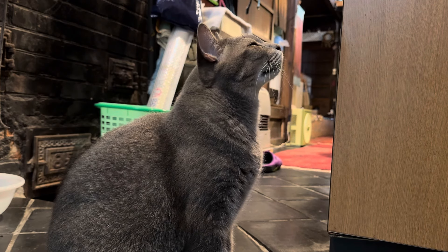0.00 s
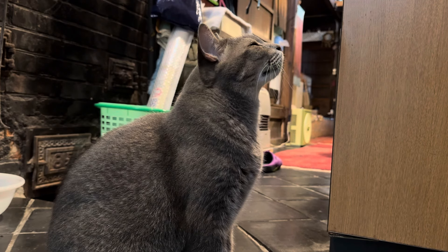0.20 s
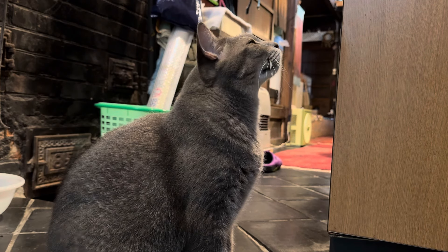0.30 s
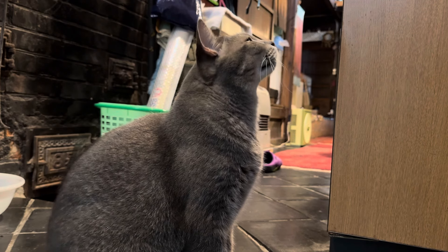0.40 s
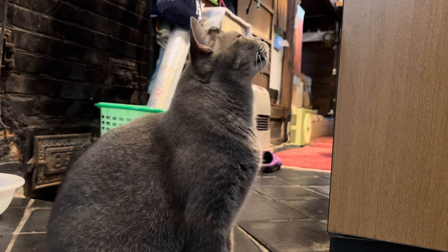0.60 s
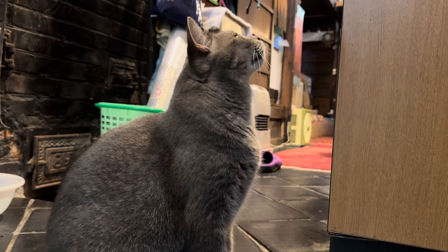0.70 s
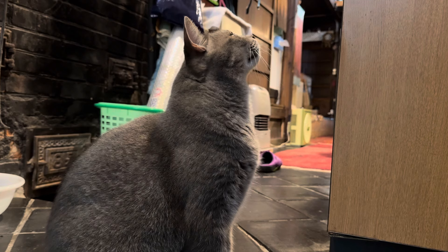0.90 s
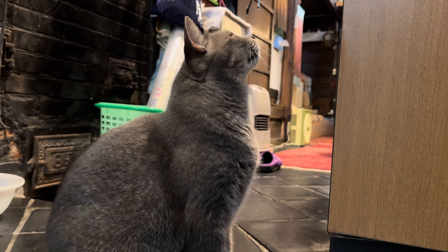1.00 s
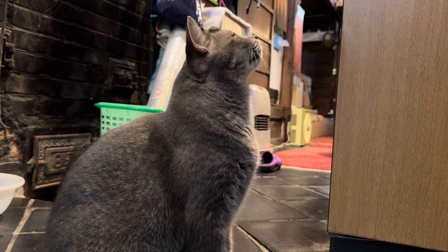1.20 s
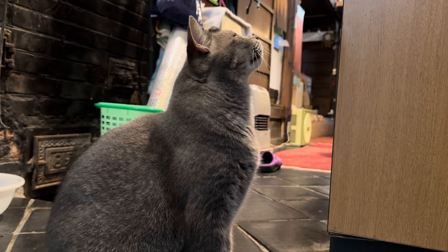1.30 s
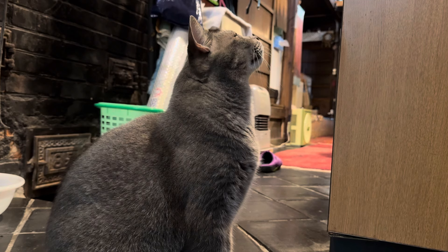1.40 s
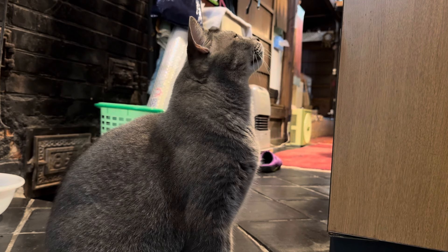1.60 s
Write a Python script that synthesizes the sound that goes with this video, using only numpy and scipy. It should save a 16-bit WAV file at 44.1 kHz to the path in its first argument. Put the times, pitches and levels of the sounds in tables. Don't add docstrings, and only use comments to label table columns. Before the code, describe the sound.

Crinkly plastic packet handled on a hollow wooden surface, with dull knocks, a scrape and crisp crackles

```python
import sys
import numpy as np
from scipy import signal
from scipy.fft import rfft, irfft, next_fast_len
from scipy.io import wavfile
from scipy.ndimage import map_coordinates

SR = 44100
rng = np.random.default_rng(int(sys.argv[2]) if len(sys.argv) > 2 else 0)


def field_ratio(decibels):
    return 10 ** (np.asarray(decibels, dtype=float) / 20)


def to_wav(s):
    ch = np.atleast_2d(s).T
    pcm = np.round(np.clip(ch, -1, 1) * 32767)
    wavfile.write(sys.argv[1], SR, pcm.astype(np.int16))


N = 74970

PORT_LAG_S = 6e-5


def unit(x):
    return x / np.sqrt(np.mean(x ** 2) + 1e-20)


def along(points, hz):
    f, v = np.transpose(points)
    return np.interp(np.log(hz + 1), np.log(f + 1), v)


def curve(rows):
    return np.interp(np.arange(N) / SR, *np.transpose(rows))


def filtered(x, response):
    m = next_fast_len(x.shape[-1] + SR // 4)
    return irfft(rfft(x, m) * response(np.fft.rfftfreq(m, 1 / SR)), m)[..., :x.shape[-1]]


def coloured(x, spectrum):
    lowest_hz = spectrum[0][0]
    return filtered(x, lambda hz: field_ratio(along(spectrum, hz)) / np.sqrt(1 + (lowest_hz / (hz + 1)) ** 4))


def add(track, s, sound):
    part = track[..., round(s * SR):][..., :sound.shape[-1]]
    part += sound[..., :part.shape[-1]]


def slips(rate, spread_db):
    released = rng.random(N) < rate / SR
    sign = rng.choice([-1, 1], N)
    size_db = spread_db * np.clip(rng.standard_normal(N), -2, 2)
    return released * sign * field_ratio(size_db)


def clumps():
    rate_hz, depth_db = 90, 1.8
    knots = rng.standard_normal(int(N * rate_hz / SR) + 4)
    return field_ratio(depth_db * map_coordinates(knots, [np.arange(N) * rate_hz / SR]))


def ringing(modes, t):
    total = 0
    for hz, db, t60, rise in modes:
        decay = field_ratio(db + rng.normal(0, 1.2) - 60 * t / t60)
        struck_hz = hz * (1 + rng.normal(0, 0.012))
        total = total + decay * (1 - np.exp(-t / rise)) * np.sin(2 * np.pi * struck_hz * t)
    return total


# frequency_hz, t60_s
ROOM_T60 = [(100, 0.37), (1000, 0.27), (5000, 0.26), (12000, 0.065)]


def room(x, wet_db):
    hz, t, z = signal.stft(rng.standard_normal((2, SR // 2)), SR, nperseg=256)
    decay = field_ratio(-60 * t / along(ROOM_T60, hz)[:, None])
    tail = signal.istft(z * decay, SR, nperseg=256)[1]
    alike = lambda f: 1 / (1 + (f / 350) ** 2)
    separate = filtered(tail, lambda f: np.sqrt(1 - alike(f)))
    tail = separate + filtered(tail[:1], lambda f: np.sqrt(alike(f)))
    late = np.pad(x, (250, 0))[None]
    return field_ratio(wet_db) * signal.fftconvolve(late, tail / np.linalg.norm(tail[0]), axes=1)


def ports(x, lag_s, pan_db):
    gain = field_ratio(np.array([[pan_db / 2], [-pan_db / 2]]))
    return filtered(x, lambda hz: np.exp(np.outer([-1j, 1j], np.pi * hz * lag_s)) * gain)


# frequency_hz, density_db
HUM_SPECTRUM = [(25, -27), (70, 5), (300, -3), (500, -12), (1400, -14), (3500, -24.5), (6800, -25.5),
                (15500, -54)]
# frequency_hz, correlation (-1 to 1)
HUM_CORRELATION = [(100, 0.96), (400, 0.82), (1000, 0.78), (6000, -0.18), (9000, -0.68), (14000, 0.39)]
# start_s, length_s, pitch_hz, width_hz, level_db
WHISTLES = [
    (.06, .14, 6700, 130, -86),
    (.07, .08, 5200, 400, -84),
    (.66, .13, 6850, 90, -87),
    (.8, .07, 6800, 110, -85),
    (.895, .09, 6500, 120, -83),
    (.02, .18, 1390, 50, -83),
    (.66, .1, 1400, 70, -76),
    (.91, .07, 1400, 60, -73),
    (.05, .17, 302, 15, -75),
]


def air():
    hum_db = -70.5
    turn = lambda hz: np.arccos(np.clip(along(HUM_CORRELATION, hz), -1, 1)) / 2
    shape = lambda hz: field_ratio(along(HUM_SPECTRUM, hz)) * [np.ones_like(hz), np.tan(turn(hz))]
    mid, side = filtered(rng.standard_normal((2, N)), shape)
    hum = field_ratio(hum_db) * np.array([mid + side, mid - side]) / np.std(mid)
    far = np.zeros((2, N))
    for s, length, hz, width, db in WHISTLES:
        t = np.arange(round(length * SR)) / SR
        narrow = filtered(rng.standard_normal((2, len(t))), lambda f: np.exp(-((f - hz) / width) ** 2))
        add(far, s, field_ratio(db) * np.sin(np.pi * t / length) ** .5 * unit(narrow))
    return hum + far


# centre_s, pitch_hz, length_s, level_db
SWINGS = [(0.258, 63, 0.064, -34), (0.293, 106, 0.075, -35), (0.386, 68.4, 0.05, -42),
          (0.456, 85, 0.099, -51), (0.576, 62, 0.085, -35.5), (0.578, 140, 0.053, -41),
          (0.689, 74, 0.042, -50), (0.838, 67, 0.066, -46), (0.895, 51, 0.077, -57),
          (0.995, 68, 0.067, -58.5), (1.174, 59, 0.083, -44.5), (1.136, 175, 0.036, -32.5),
          (1.164, 180, 0.012, -30.5), (.2365, 150, .024, -28.5), (.2305, 275, 0.015, -31.5),
          (.64, 122, 0.031, -51.5), (.95, 123, 0.066, -66), (1.248, 125, 0.067, -57),
          (1.398, 69.4, 0.058, -37.5), (1.464, 67, 0.039, -45), (1.598, 61, 0.052, -56.5),
          (1.515, 180, 0.026, -53.5), (1.565, 180, 0.072, -58.5), (1.62, 177, 0.042, -58),
          (1.69, 193, 0.027, -54), (0.478, 118, 0.044, -55), (1.03, 150, 0.075, -63),
          (0.737, 44, 0.054, -64), (0.41, 281, 0.064, -54.5), (1.6, 286, 0.048, -60.5),
          (.99, 330, 0.063, -64.5)]


def thumps():
    x = np.zeros(N)
    for s, hz, length, db in SWINGS:
        t = np.arange(round(2 * length * SR)) / SR - length
        swell = np.exp(-2 * (2 * t / length) ** 2)
        add(x, s - length, field_ratio(db) * swell * np.cos(2 * np.pi * hz * t))
    return ports(x, PORT_LAG_S, pan_db=1.47) + room(x, wet_db=-14.0)[:, :N]


# pitch_hz, width_hz, level_db
WOOD_RESONANCES = [(76, 40, -9), (166.3, 16, 0), (295, 23, 0), (624, 500, -16), (916, 158, -7.5),
                   (1400, 115, -9.5), (1560, 230, -12), (2250, 104, -8.5), (2900, 770, -19.5),
                   (3850, 2300, -22)]
# time_s, level_db
DRAG_PRESSURE = [
    (1.0, -110),
    (1.2, -84),
    (1.24, -64.5),
    (1.31, -58.5),
    (1.34, -45.5),
    (1.42, -53.5),
    (1.47, -74),
    (1.51, -72.5),
    (1.62, -64.5),
    (1.7, -73),
]


def drag():
    def wood(f):
        response = 0
        for k, (centre, width, db) in enumerate(WOOD_RESONANCES):
            damping = 1j * f * width
            response = response + (-1) ** k * field_ratio(db) * damping / (centre * centre - f * f + damping)
        return response

    pressure = field_ratio(curve(DRAG_PRESSURE)) * clumps() ** 2
    x = pressure * unit(filtered(slips(rate=700, spread_db=6), wood))
    return ports(x, PORT_LAG_S, pan_db=-0.8) + room(x, wet_db=-2.5)[:, :N]


FILM_RATE, FILM_SPREAD_DB = 3500, 6
SNAP_PAN_DB = .5
# start_s, centre_hz, rise_s, t60_s, level_db
BRIGHT_SIZZLES = [(.7925, 12500, .001, .16, -67), (1.1176, 12000, .002, .1, -60),
                  (1.2223, 13000, .0005, .03, -50), (1.4545, 12500, .0005, .03, -47),
                  (1.5865, 11000, .0004, .018, -48), (1.5924, 11500, .0004, .018, -52),
                  (1.6695, 14000, .0003, .012, -40), (1.2917, 9000, .003, .1, -48),
                  (1.3035, 8200, .003, .17, -42), (1.44, 12000, .006, .08, -54), (.2225, 13500, .001, .13, -60)]


def sizzles():
    width_hz = 2700
    x, t = np.zeros(N), np.arange(SR // 5) / SR
    for s, hz, rise, t60, db in BRIGHT_SIZZLES:
        grains = unit(slips(FILM_RATE, FILM_SPREAD_DB)[:len(t)]) + rng.standard_normal(len(t))
        sizzle = unit(filtered(grains, lambda f: 1 / (1 + ((f - hz) / width_hz) ** 4)))
        add(x, s, field_ratio(db - 60 * t / t60) * (1 - np.exp(-t / rise)) * sizzle)
    return ports(x, PORT_LAG_S, SNAP_PAN_DB) + room(x, wet_db=-5)[:, :N]


# start_s, crack_db, low_ring_db, middle_ring_db, high_ring_db
SNAP_EVENTS = [(.2225, -55, -36, -38, -29.5), (.5335, -64, -41, -31, -36), (.7915, -61, -50, -60, -50),
               (.8, -68, -38, -54, -61), (0.81, -72, -39, -51, -56), (1.231, -52, -47, -43, -55),
               (1.253, -40, -60.5, -38, -52), (1.27, -47, -62, -36.5, -51), (1.306, -31, -35, -32.5, -64),
               (1.325, -59, -51, -61, -35.5), (1.338, -50, -38, -36, -46), (1.357, -40, -56, -66, -58),
               (1.366, -50, -36, -50, -36), (1.379, -47, -44, -50, -47), (1.392, -49, -51, -52, -48),
               (1.442, -48, -41.5, -63, -48), (1.4552, -34, -42, -65, -54), (1.5512, -55, -76, -58, -64),
               (1.5541, -62, -44.5, -48, -62), (1.5985, -50, -46, -65, -68), (1.631, -43.5, -63, -55, -53),
               (1.6693, -30.5, -39.5, -51, -59), (1.6718, -29, -45, -33, -47.5)]
# frequency_hz, density_db
CRACK_SPECTRUM = [(500, -12), (1500, 0), (4000, -9), (6500, -3.5), (8500, 6), (11000, -10), (15500, -26)]
# pitch_hz, t60_s, rise_s
AIR_POCKET = [(929, 0.018, 0.00063), (1652, 0.015, 0.0017), (2300, 0.018, 0.0016)]


def snaps():
    crack_t60 = .011
    x, t = np.zeros(N), np.arange(SR // 16) / SR
    for s, db, *rings_db in SNAP_EVENTS:
        noise = unit(coloured(rng.standard_normal(len(t)), CRACK_SPECTRUM))
        crack = field_ratio(db - 60 * t / crack_t60) * (1 - np.exp(-t / 0.00083)) * noise
        modes = [(hz, ring_db, t60, rise) for (hz, t60, rise), ring_db in zip(AIR_POCKET, rings_db)]
        add(x, s, crack + ringing(modes, t))
    return ports(x, PORT_LAG_S, SNAP_PAN_DB) + room(x, wet_db=-11)[:, :N]


# time_s, level_db
CRINKLE_EFFORT = [(.21, -81), (.24, -118), (.44, -76.5), (.55, -57.5), (.66, -75.5), (.7, -106), (.96, -88),
                  (.985, -66.5), (1.1, -66), (1.13, -59), (1.22, -54.5), (1.29, -53.5), (1.32, -49),
                  (1.37, -55), (1.44, -53.5), (1.48, -61), (1.56, -69), (1.65, -70), (1.7, -58)]
# frequency_hz, density_db
FILM_SPECTRUM = [(400, -6.5), (950, -4), (1600, -8), (2800, -11), (5000, -15), (8500, -8), (12000, -13),
                 (15800, -18.5)]


def crinkle():
    grains = unit(slips(FILM_RATE, FILM_SPREAD_DB)) + .5 * rng.standard_normal(N)
    x = field_ratio(curve(CRINKLE_EFFORT)) * clumps() * unit(coloured(grains, FILM_SPECTRUM))
    return ports(x, PORT_LAG_S, pan_db=1.0) + room(x, wet_db=-6.5)[:, :N]


# (per half octave, well above 2.6 kHz)
BUMP_EVENTS = [(.222, -29, -29.5, -37.5, 1.5), (.2345, -40, -42, -42, 1), (.246, -38.5, -45, -45, -2),
               (.262, -43, -56, -50.5, 2.5), (0.5337, -35, -33, -43, -0.5), (.791, -54, -61, -48, -3),
               (.805, -70, -68, -51, -4), (.82, -39.5, -42.5, -75.5, 6), (1.124, -41.5, -39.5, -48, -0.5),
               (1.157, -50.5, -86, -86, -7), (0.299, -46, -60, -54.5, 3), (.866, -47, -63, -87, -21),
               (1.387, -45, -45, -55.5, -1.5), (0.362, -49, -51, -54, 1), (1.452, -44.5, -65, -79.5, 9.5)]
# pitch_hz, level_db, t60_s, rise_s
BOX_MODES = [(180.1, 3, 0.14, 0.0065), (132.5, -1.5, 0.19, 0.0064), (209.7, -7, 0.34, 0.0048)]
# pitch_hz, level_db, t60_s, rise_s
PANEL_MODES = [(296.7, 3.5, 0.1367, 0.0028), (264.7, 6, 0.12, 0.031), (407.5, -16, 0.4, 0.00076),
               (578, -9.5, 0.11, 0.0034)]
# pitch_hz, level_db, t60_s, rise_s
FRONT_MODES = [(906, -5.5, 0.035, 0.0014), (1081.4, -3, 0.077, 0.0026), (1379, -0.5, 0.11, 0.0011),
               (1600, 1, 0.034, 0.00044), (2246, -2, 0.063, 0.0012), (2670, -6.5, 0.073, 0.0023)]
# frequency_hz, density_db
SLAP_SPECTRUM = [(300, -3), (550, -8.5), (1100, -11.5), (1400, -13.5), (2500, -20), (3100, -24.5),
                 (8000, -33), (15500, -65.5)]
# centre_hz, width_hz, lift_db
SLAP_BANDS = [(943, 230, 4), (1433, 75, 3), (1510, 84, 0.5), (2236, 240, 1.5), (2680, 250, 1)]


def bumps():
    slap_t60, slap_hold_s, front_db = 0.16, 0.02, -1.5
    body_late_s = 0.003986
    direct, wet, t = np.zeros(N), np.zeros((2, N)), np.arange(SR // 2) / SR
    lift_db = lambda hz: sum(db * np.exp(-((hz - centre) / width) ** 2) for centre, width, db in SLAP_BANDS)
    fall = field_ratio(-60 * np.maximum(t - slap_hold_s, 0) / slap_t60) * (1 - np.exp(-t / 0.00023))
    for s, box_db, panel_db, slap_db, bright_db in BUMP_EVENTS:
        tilt = lambda hz: field_ratio(bright_db * np.log2(1 + (hz / 2600) ** 2) + lift_db(hz))
        noise = filtered(unit(coloured(rng.standard_normal(len(t)), SLAP_SPECTRUM)), tilt)
        slap = field_ratio(slap_db) * (fall * noise + field_ratio(front_db) * ringing(FRONT_MODES, t))
        ring = field_ratio(box_db) * ringing(BOX_MODES, t) + field_ratio(panel_db) * ringing(PANEL_MODES, t)
        add(direct, s, 0.77 * slap)
        add(direct, s + body_late_s, ring)
        add(wet, s, room(slap, wet_db=-8))
        add(wet, s + body_late_s, room(ring, wet_db=-12.5))
    return ports(direct, PORT_LAG_S, pan_db=1.6) + wet


def scene():
    return bumps() + thumps() + drag() + crinkle() + snaps() + air() + sizzles()


def low_pass(x):
    return signal.sosfilt(signal.butter(12, 16820, fs=SR, output="sos"), x)


# frequency_hz, gain_db
MID_RESPONSE = [(30, 3), (50, 0), (7800, -0.5), (8600, -9), (9800, -1), (10800, -2)]
# frequency_hz, gain_db
SIDE_RESPONSE = [(60, 10.5), (150, 1.5), (400, 7.5), (1200, 5.5), (2500, 0), (12000, -3), (15500, 1)]
# frequency_hz, left_over_right_db
PORT_BALANCE = [(60, -3), (250, 0.1), (500, -1.5), (1000, -3), (2000, -0.1), (4000, 4.5), (8000, 4.7),
                (12000, -0.4)]


def record(dry):
    top_hz, over_top_db = 15870, -22
    pair = np.array([dry[0] + dry[1], dry[0] - dry[1]]) / 2

    def response(hz):
        colour_db = np.array([along(MID_RESPONSE, hz), along(SIDE_RESPONSE, hz)])
        return field_ratio(colour_db + over_top_db * (hz > top_hz))

    mid, side = filtered(pair, response)
    balance = lambda hz: field_ratio(np.outer([.5, -.5], along(PORT_BALANCE, hz)))
    wide = filtered(np.array([mid + side, mid - side]), balance)
    return low_pass(wide)


dry = scene()
out = record(dry)
to_wav(out)
```